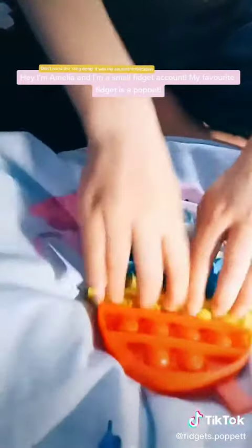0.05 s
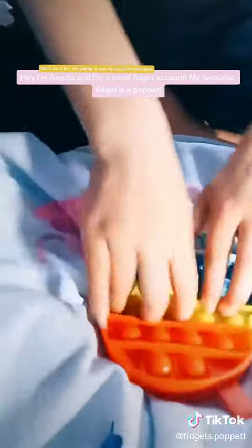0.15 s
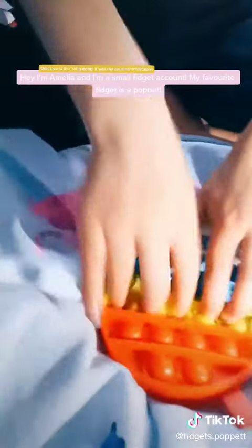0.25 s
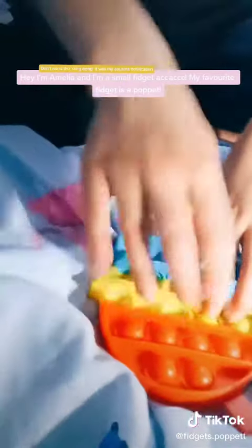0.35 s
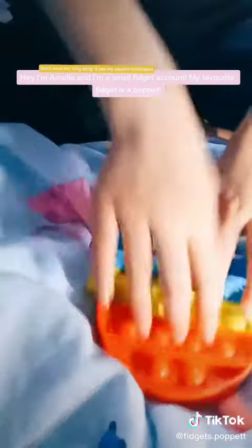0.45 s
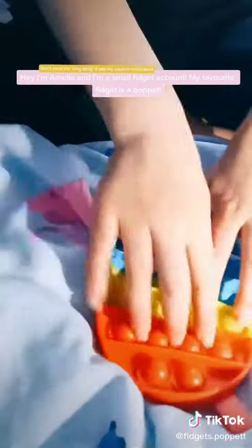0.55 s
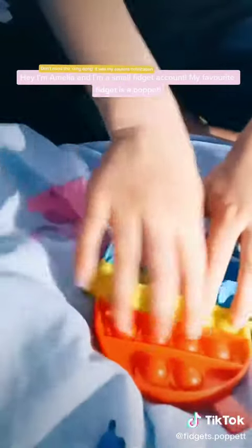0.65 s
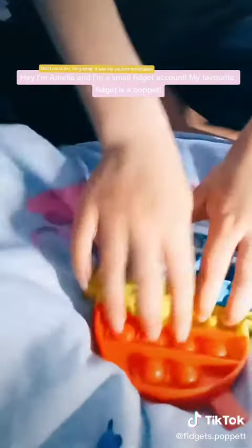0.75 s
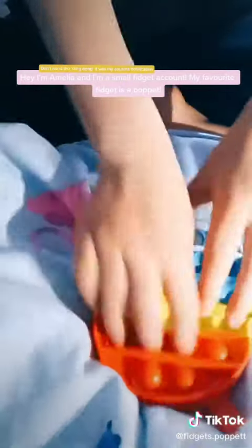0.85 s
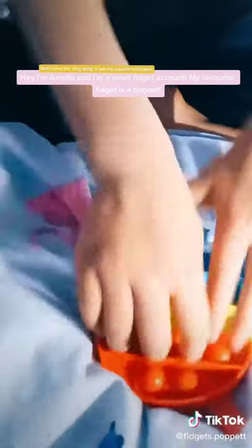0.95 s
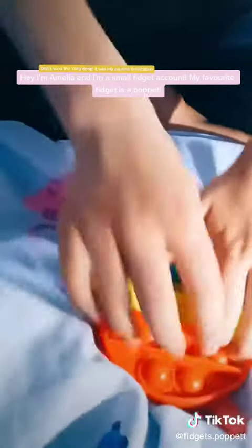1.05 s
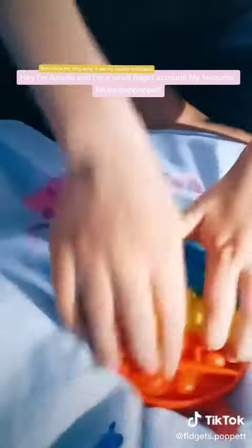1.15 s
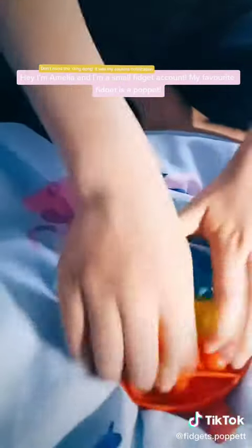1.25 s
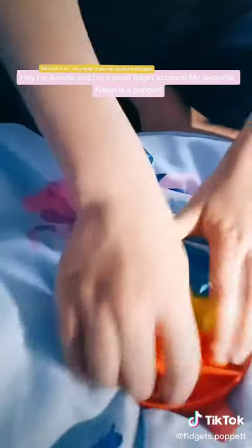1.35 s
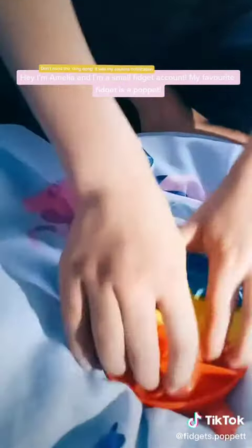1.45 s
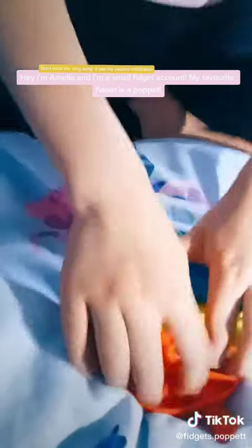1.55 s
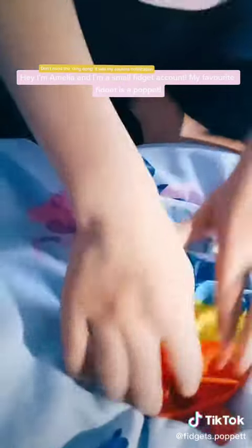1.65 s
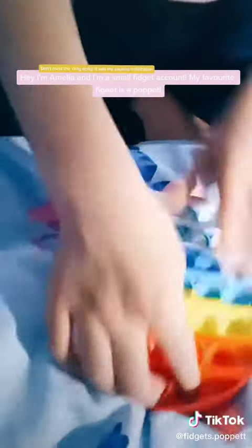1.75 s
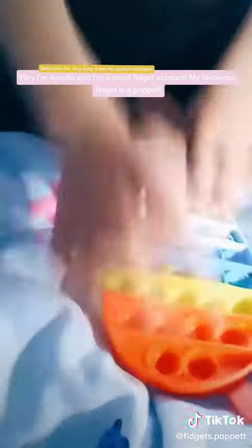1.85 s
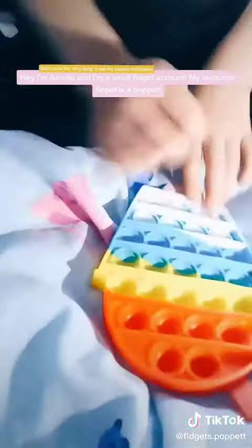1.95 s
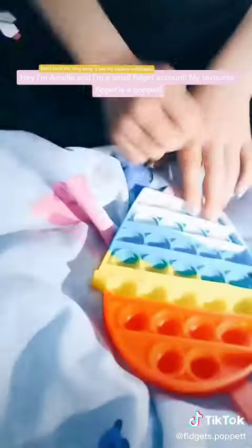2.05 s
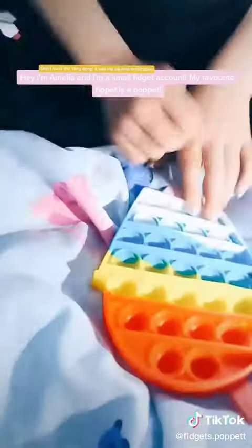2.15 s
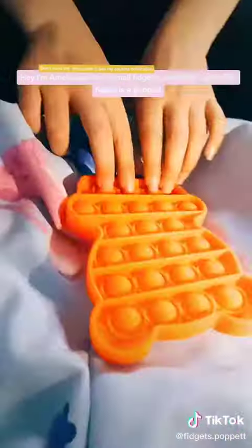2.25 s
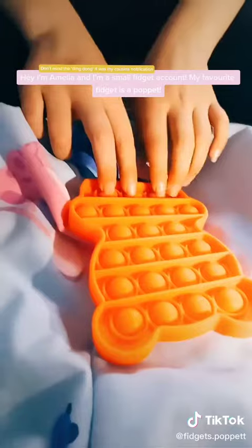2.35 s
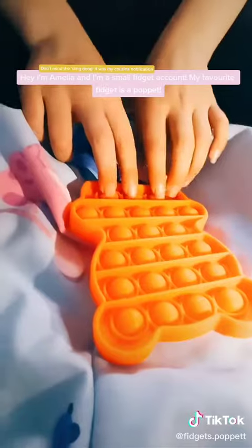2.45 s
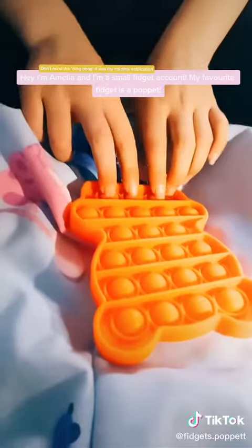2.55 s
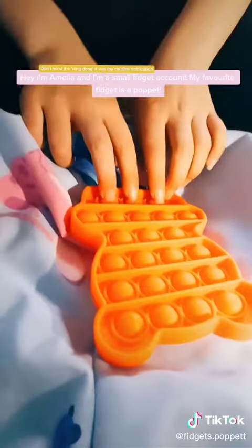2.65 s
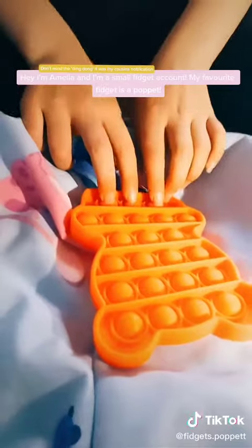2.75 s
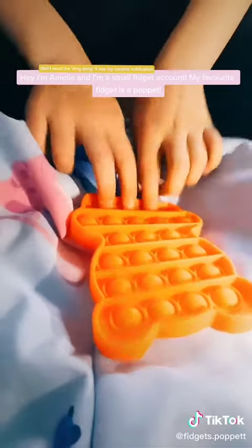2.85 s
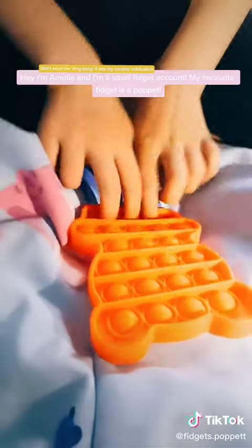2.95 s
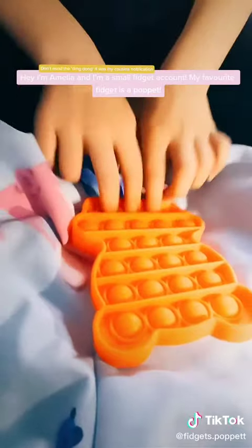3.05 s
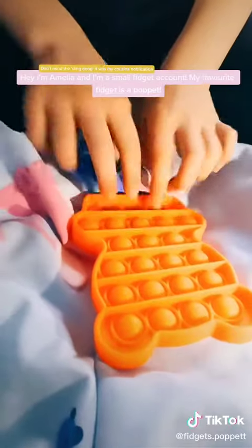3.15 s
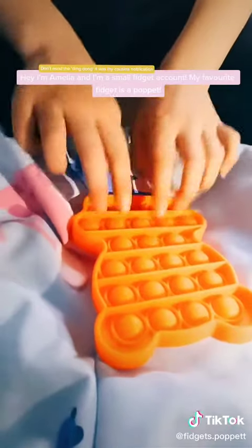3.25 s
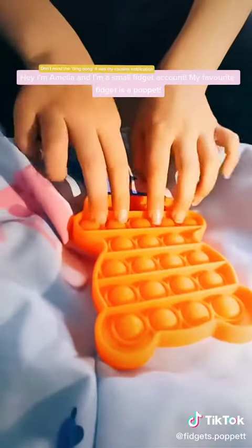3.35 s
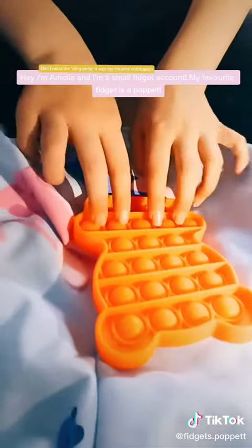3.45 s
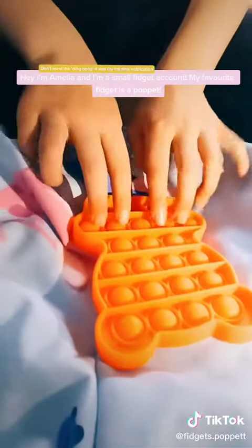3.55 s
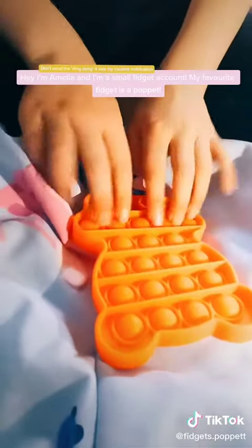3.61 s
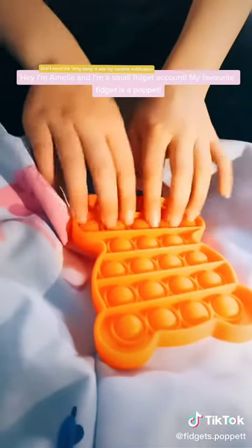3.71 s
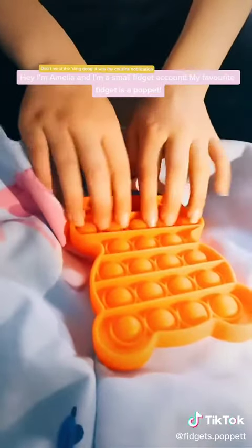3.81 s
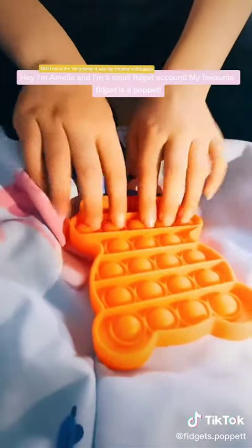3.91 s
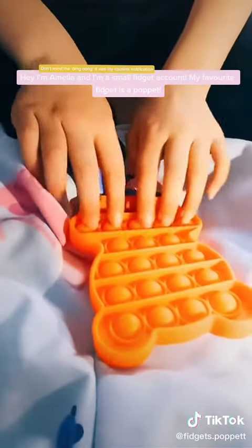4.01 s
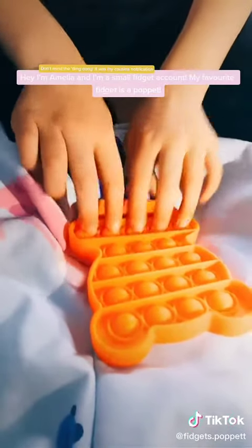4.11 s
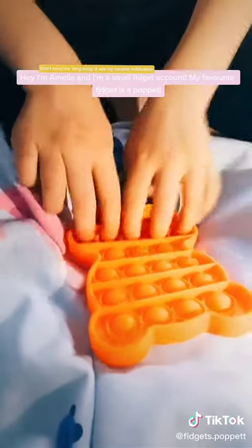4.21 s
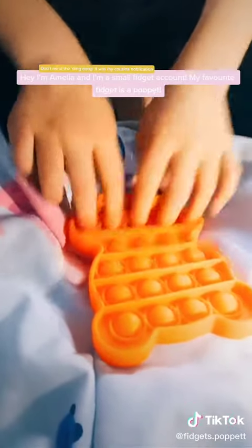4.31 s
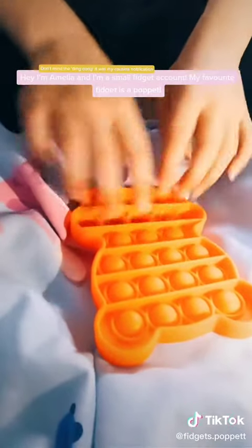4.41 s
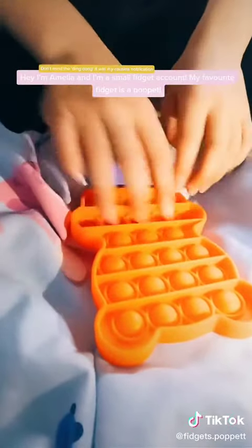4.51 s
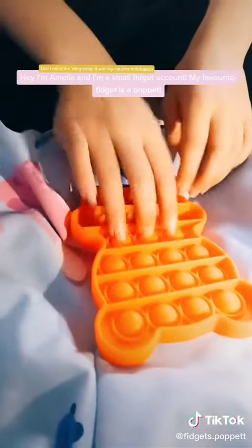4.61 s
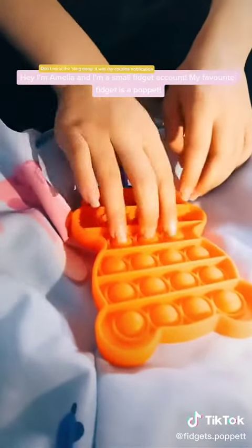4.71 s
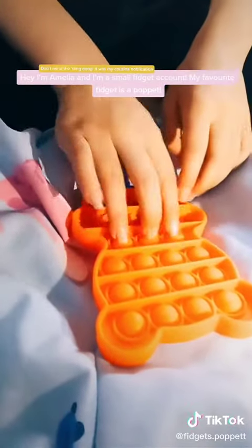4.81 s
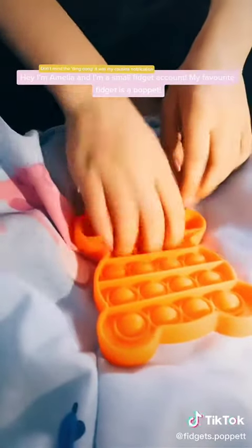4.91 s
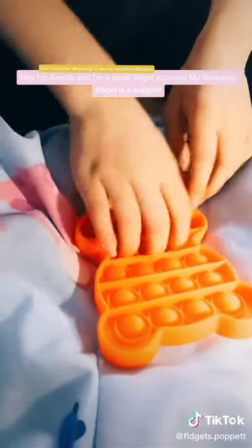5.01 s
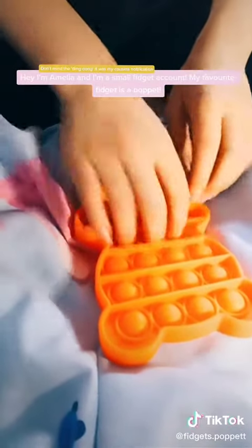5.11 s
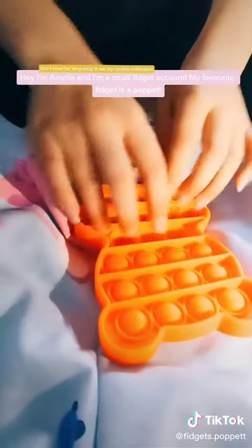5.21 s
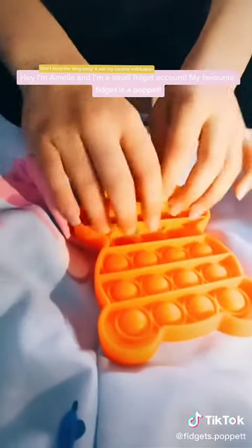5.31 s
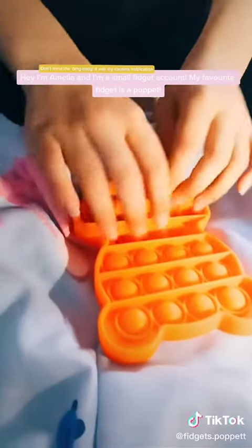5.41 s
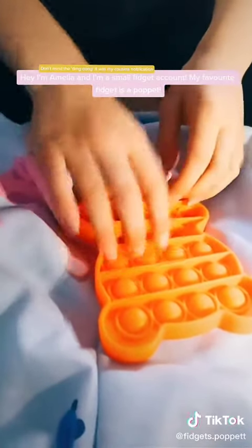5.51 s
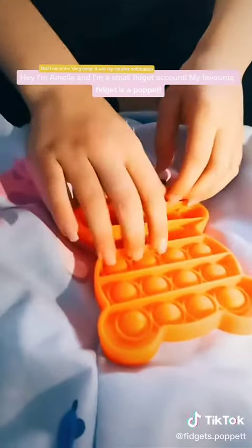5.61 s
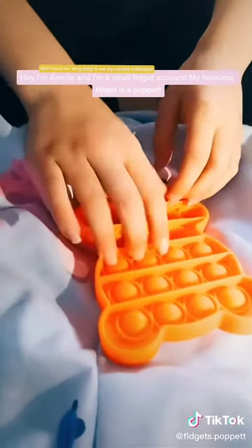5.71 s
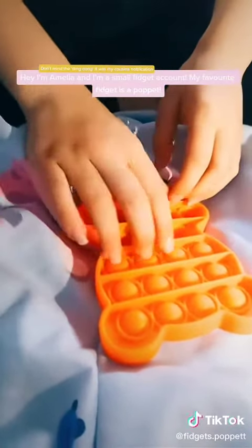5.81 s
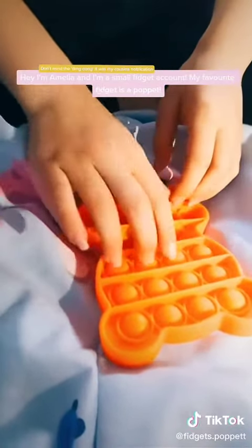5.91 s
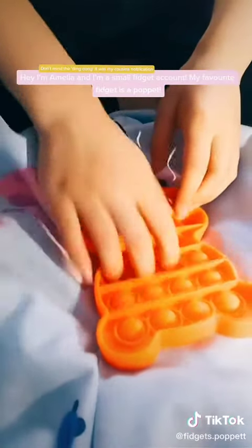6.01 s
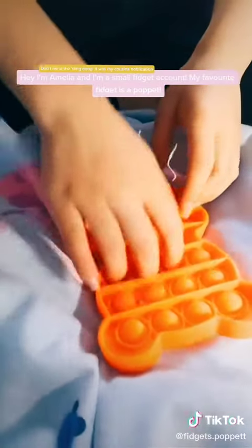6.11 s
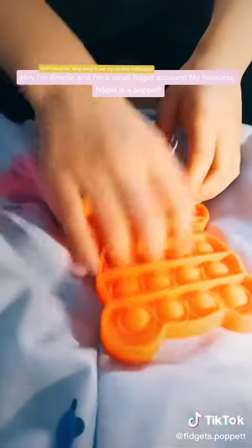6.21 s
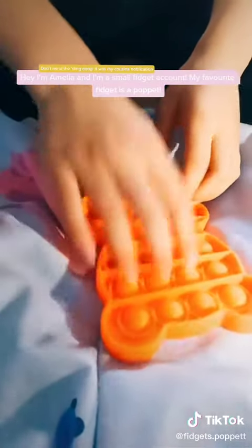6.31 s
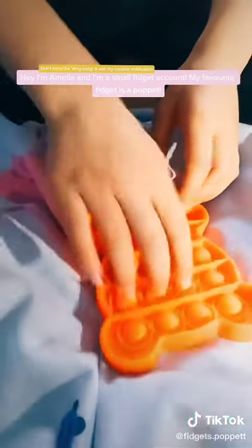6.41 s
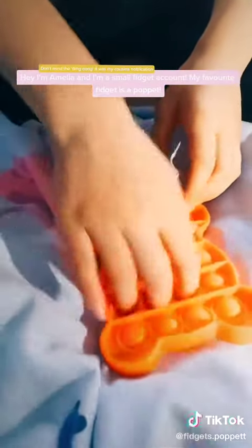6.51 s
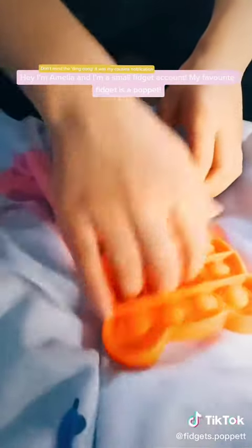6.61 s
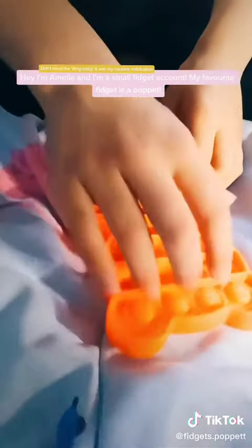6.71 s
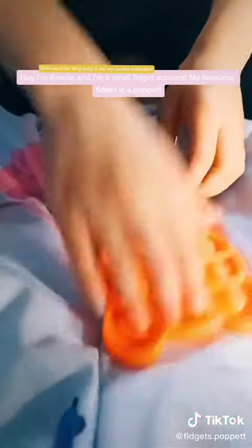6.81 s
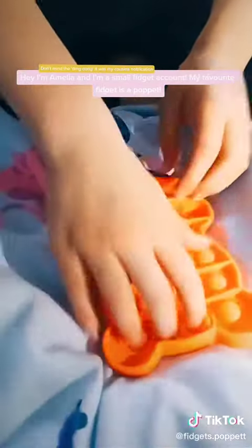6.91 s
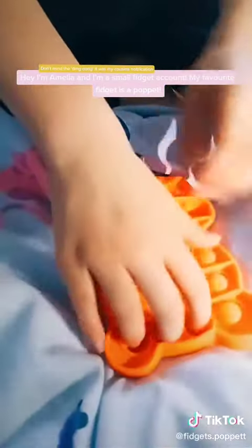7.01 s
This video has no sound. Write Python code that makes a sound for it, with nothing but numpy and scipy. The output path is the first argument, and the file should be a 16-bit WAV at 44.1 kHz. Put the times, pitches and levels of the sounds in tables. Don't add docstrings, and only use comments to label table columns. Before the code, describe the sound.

Crisp, punchy snaps of a rubber bubble toy come in uneven bursts and pauses, close up, with faint skin rubs and one plastic click.

```python
import sys
import numpy as np
from scipy import signal
from scipy.fft import rfft, irfft, next_fast_len
from scipy.io import wavfile
from scipy.ndimage import uniform_filter1d

SR = 44100
rng = np.random.default_rng(int(sys.argv[2]) if len(sys.argv) > 2 else 0)


def level_to_linear(level):
    exponent = np.asarray(level, float) / 20
    return 10 ** exponent


def waveform_to_disk(signal):
    frames = np.transpose(np.atleast_2d(signal))
    scaled = np.clip(frames, -1, 1) * 32767
    samples = np.round(scaled).astype(np.int16)
    wavfile.write(sys.argv[1], SR, samples)


N = 311346


def unit(x):
    return x / np.sqrt(np.mean(x ** 2))


def noise(*shape):
    return rng.standard_normal(shape)


def sine(hz, t):
    return np.sin(2 * np.pi * hz * t)


def colour(x, points):
    size = next_fast_len(x.shape[-1])
    hz, db = np.transpose(points)
    f = np.maximum(np.arange(size // 2 + 1) * SR / size, 1)
    gain = level_to_linear(np.interp(np.log(f), np.log(hz), db))
    return irfft(rfft(x, size) * gain, size)[..., :x.shape[-1]]


def band(x, lo_hz, hi_hz):
    sos = signal.butter(2, [lo_hz, min(hi_hz, 0.45 * SR)], "band", fs=SR, output="sos")
    return signal.sosfilt(sos, x)


def walk(rate):
    hold = int(SR / rate)
    levels = np.repeat(noise(N // hold + 1), hold)
    return uniform_filter1d(levels, hold)[:N]


def fade(t, t60):
    return (t >= 0) * np.exp(-np.log(1000) * np.maximum(t, 0) / t60)


def add(track, s, sound, lead):
    i = int(s * SR) - lead
    track[..., i:i + sound.shape[-1]] += sound[..., :N - i]


def stereo(mid, side):
    return mid + side * np.array([[1], [-1]])


# f/Hz, level/dB per Hz
ROOM_TONE = [(120, -30), (200, -1), (370, -7.5), (433, -11.5), (520, -2.5), (625, -11.5), (1030, -10.5),
             (1200, -13.5), (1450, -7.5), (1860, -14.5), (3340, -15.5), (5820, -17), (7500, -28),
             (11000, -36.5)]
# f/Hz, level/dB per Hz
FAR_RUMBLE = [(20, -45), (40, -15.5), (60, -4.5), (95, 0), (150, -6), (220, -16.5), (350, -45)]
# f/Hz, level/dB per Hz
TOP_HISS = [(9000, -39), (12000, -10.5), (13200, -3.5), (15500, 1), (16100, -19), (17000, -61)]
# on t/s, off t/s
SCREEN_WHINE = [(2.9, 3.83), (4.2, 4.88), (1.5, 1.6)]
# t/s, level/dB
PHONE_GAIN_RIDE = [(0, 2.5), (.07, -.5), (1.0, 2), (1.62, -1), (1.78, -6.5), (2.02, -2), (2.18, -1.1),
                   (2.224, -20), (2.42, -7.5), (2.7, -2), (3.1, 0.35), (6.75, 0), (7.06, 3)]


def air(t):
    gain_db = np.interp(t, *np.transpose(PHONE_GAIN_RIDE))
    hum, rumble, hiss = (unit(colour(noise(2, N), shape)) for shape in (ROOM_TONE, FAR_RUMBLE, TOP_HISS))
    hum_db = 3 - 73 + gain_db + 0.99 * walk(7.8)
    rumble_db = -69 + 2 * gain_db + 6.5 * walk(12)
    hiss_climb_db = 0.7 * (t - 2.5)
    hiss_db = -85.5 + 0.7 * gain_db + hiss_climb_db + 2.2 * walk(16)
    out = level_to_linear(hum_db) * stereo(hum[0], level_to_linear(-2.0) * hum[1])
    out += level_to_linear(rumble_db) * stereo(rumble[0], level_to_linear(-5.5) * rumble[1])
    out += level_to_linear(hiss_db) * stereo(hiss[0], level_to_linear(-2.0) * hiss[1])
    whine_on = sum((t > start) & (t < stop) for start, stop in SCREEN_WHINE)
    out[1] += level_to_linear(-78) * whine_on * sine(15331, t)
    return out


def snap(t, hz, bright_db):
    width = 0.29 / hz * np.where(t < 0, 1.15, 0.9)
    edge = 0.057 / hz * level_to_linear(-0.5 * bright_db + 3.0)
    push = -np.tanh(t / edge) * np.exp(-(t / width) ** 2) * np.where(t < 0, 0.97, 1.1)
    return push / np.abs(push).max()


# t/s, peak level/dB, snap f/Hz, edge brightness/dB
STRIPED_TRAY = [(0.0906, -1.3, 1804, -1.5), (0.1002, -0.63, 1260, -1.5), (0.1106, -0.5, 2644, 1.5),
                (0.1116, -5.5, 1540, -11), (0.4649, -26, 810, -48), (0.4717, -34, 916, -23),
                (0.4907, -39, 618, -25.5), (0.4948, -31.5, 873, -14), (0.5341, -31, 2420, 6),
                (0.5357, -29, 1290, -16), (0.538, -29.5, 1010, -20), (0.7495, 2.5, 1330, -11.5),
                (0.7719, -2, 2167, 6), (0.853, 0.93, 2580, -1), (0.8574, -2, 1670, -8.5),
                (0.871, -0.5, 1700, -8), (0.96, -32.5, 1530, -10), (1.2408, 1.15, 1645, -7),
                (1.3297, -35, 1457, -5), (1.1848, -24.5, 1500, -12), (1.3471, -20.5, 912.5, -13),
                (1.351, -27.5, 1862, 6), (1.4891, 3, 2313, -11), (1.4917, -14.5, 1291, -5.5),
                (1.627, 1.5, 1287, -15)]
# t/s, peak level/dB, snap f/Hz, edge brightness/dB
PLAIN_TRAY_FIRST = [(2.8233, -18, 868, -31.5), (2.8244, -20.5, 1382, -11), (2.8263, -26.5, 1011, -21),
                    (2.8555, -23, 930, -26.5), (2.8655, -1.5, 1800, -3), (2.8857, -1, 1720, -14),
                    (2.887, -11, 1900, -7), (2.9019, -4, 1368, -15), (4.1293, -12, 1160, -29),
                    (4.1303, -19, 1397, -26), (4.1367, -9.5, 1083, -21), (4.1422, 1, 1500, -0.5),
                    (4.1433, -2.5, 1940, 0.5), (4.148, -2, 1511, -13.5), (4.1535, -2, 1370, -17.5),
                    (4.1918, -7, 1090, -16.5), (4.921, -6, 1044, -16.5), (4.9297, -1.2, 1405, -13),
                    (4.9332, -7.5, 1133, -18.5), (4.9415, -4, 1240, -10.5), (4.958, -1.5, 1770, 3.5)]
# t/s, peak level/dB, snap f/Hz, edge brightness/dB
PLAIN_TRAY_LATER = [(5.9899, -11, 980, -26.5), (6.0013, -3.5, 3510, 8), (6.0022, -5.5, 1166, -5.5),
                    (6.017, -9.5, 1150, -7.5), (6.0188, -0.5, 1298, -11.5), (6.0205, 0.5, 1152, -24),
                    (6.44, -9.5, 892, -30.5), (6.4648, 4, 1507, -20), (6.466, -7.5, 1330, -8),
                    (6.4837, -5.5, 1385, -12), (6.8807, -0.5, 1325, -9.5), (6.8863, -17, 1010, -5),
                    (6.9061, 1.1, 1810, -11), (6.9068, -11, 1988, -3), (6.9236, -0.85, 1172, -13.5),
                    (6.9257, -9.5, 1358, -17)]
SPIT_LEVELS = (-40.5, -41.5, -47.5)
ROOM_SHARES = (1, 2.96, 1.8)
# f/Hz, level/dB, t60/s
DOME_MODES = [(1184, -9.5, 0.0091), (560, -21.5, 0.012), (2000, -22.5, 0.0033), (2960, -16.5, 0.0047),
              (4100, -12, 0.0039), (5550, -18, 0.0011)]
# delay t/s, level/dB
BED_BOUNCES = [
    (.0013, -13),
    (.0023, -21),
    (.0036, -28),
]


def pop_sound(t, hz, bright_db, puff):
    pop = snap(t, hz, bright_db)
    for late, bounce_db in BED_BOUNCES:
        level_luck, time_luck = noise(2)
        bounce = snap(t - late * (1 + 0.18 * time_luck), hz * 1.6, bright_db - 2.5)
        pop = pop + level_to_linear(bounce_db + 2.5 * level_luck) * bounce
    mode_hz, mode_db, t60 = (column[:, None] for column in np.transpose(DOME_MODES))
    level_luck, pitch_luck = noise(2, len(mode_hz), 1)
    edge_db = 0.66 * (bright_db + 8) * np.clip(mode_hz / 3000 - 0.3, 0, 1)
    size = level_to_linear(mode_db + 2.2 * level_luck + edge_db)
    ring = size * fade(t, t60) * sine(mode_hz * (1 + 0.11 * pitch_luck), t)
    creak = level_to_linear(-8.5 + 0.6 * bright_db) * band(puff, 1000, 7000)
    return pop - np.sum(ring, axis=0) + creak


def pops():
    near, spit, send = np.zeros((3, N))
    lead = 256
    t = (np.arange(1024) - lead) / SR
    trays = (STRIPED_TRAY, PLAIN_TRAY_FIRST, PLAIN_TRAY_LATER)
    for tray, tray_spit_db, share_db in zip(trays, SPIT_LEVELS, ROOM_SHARES):
        for s, db, hz, bright_db in tray:
            puff = noise(1024) * np.exp(-np.abs(t) / 0.001)
            pop = level_to_linear(db - 3.5) * pop_sound(t, hz, bright_db, puff)
            spit_db = 2 * db + 0.3 * bright_db + tray_spit_db
            add(near, s, pop, lead)
            add(spit, s, level_to_linear(spit_db) * band(puff, 6300, 15000), lead)
            add(send, s, pop * level_to_linear(share_db), lead)
    return near, spit, send


# f/Hz, level/dB, t60/s
ROOM_BANDS = [(170, -2.5, .25), (335, 1, 0.22), (637, -2.5, .24), (1150, 2.5, 0.24), (1940, -1, .25),
              (3170, -2, 0.19), (4600, -6, 0.31), (6300, -11, 0.38)]


def echo(t):
    gap_s, build_s, gate_s = 0.0071, 0.0027, 0.135
    shape = np.clip((t - gap_s) / build_s, 0.12, 1) * np.exp(-(t / gate_s) ** 4)
    out = np.zeros(len(t))
    for hz, db, t60 in ROOM_BANDS:
        out += level_to_linear(db) * fade(t, t60) * band(noise(len(t)), hz / 1.3, hz * 1.3)
    out *= shape
    return out / np.sqrt(np.sum(out ** 2))


def room(x):
    t = np.arange(SR // 2) / SR
    mid, side = (signal.fftconvolve(x, echo(t))[:N] for _ in range(2))
    return level_to_linear(-21) * stereo(mid, level_to_linear(-20) * side)


# t/s, level/dB, f/Hz
HAND_THUDS = [(.14, -33.5, 151), (.295, -53.5, 117), (0.489, -33, 105), (0.549, -49, 101),
              (0.898, -44, 111), (1.012, -36, 106), (1.03, -42, 170), (1.075, -54.5, 90),
              (1.179, -32.5, 88.5), (1.198, -31.5, 153), (1.277, -47, 99), (1.343, -24, 147),
              (1.4, -45.5, 108), (1.582, -49, 117), (1.871, -44.5, 190), (1.922, -45, 109.5),
              (2.07, -49, 120), (2.096, -46.5, 118.4), (3.699, -55, 100), (5.535, -47.5, 98.6),
              (6.18, -61, 79), (6.346, -46, 88.8), (6.651, -50.5, 110), (6.796, -42.5, 62),
              (6.961, -53, 89)]


def thuds():
    out, t = np.zeros((2, N)), np.arange(SR // 3) / SR
    for s, db, hz in HAND_THUDS:
        t60 = 14 / hz * level_to_linear(-0.18 * (db + 45))
        grumble = unit(band(noise(2, len(t)), hz / 2, hz * 2.0))
        wobble = -sine(hz, t) + 0.83 * grumble
        add(out, s, level_to_linear(db) * wobble * fade(t, t60) * np.minimum(t / 0.0078, 1), 0)
    return stereo(out[0], level_to_linear(-16.5) * (out[1] - out[0]))


# middle t/s, length t/s, level/dB, dull part level/dB
SKIN_RUBS = [(0.2, .02, -57.5, -7), (0.331, 0.13, -63, -8), (.49, 0.057, -61.5, 3.5),
             (0.56, 0.032, -65, -3), (0.686, 0.057, -62.5, -8), (0.959, 0.024, -56, 1.5),
             (1.086, 0.05, -63.5, 2), (1.351, 0.039, -51.5, -2), (1.868, 0.076, -61, 2),
             (1.915, 0.046, -52.5, 0.5), (1.952, 0.037, -62, -1.5), (2.102, 0.052, -58.5, 0),
             (3.796, 0.18, -76.5, 2), (4.352, 0.084, -63.5, 1.5), (4.442, 0.093, -72.5, -6.5),
             (5.197, 0.089, -74.5, -1.5), (5.543, 0.042, -68, 2.5), (6.2, 0.045, -53, -11),
             (6.231, 0.033, -58, -4.5), (6.659, 0.052, -52.5, -4.5), (6.696, 0.043, -67.5, 2.5),
             (7.043, 0.045, -65.5, -19.5)]
# f/Hz, level/dB per Hz
RUB_BRIGHT = [(1500, -23), (2500, -12), (4000, 0), (5500, 0), (6500, -5), (8300, -28.5), (12000, -39),
              (15000, -30), (16500, -38)]
# f/Hz, level/dB per Hz
RUB_DULL = [(150, -17.5), (500, 1.5), (1000, -6.5), (1700, 2.5), (2500, -9.5), (4000, -32.5)]


def rubs(t):
    grains = noise(2, N) * level_to_linear(3.2 * rng.exponential(size=N) + 1.8 * walk(90))
    patches = np.zeros(N)
    for hz in (150, 240, 380, 610, 980, 1570, 2500, 4000, 6400, 10300):
        patches += band(grains[0], hz, hz * 1.6) * level_to_linear(2.5 * walk(22))
    bright = unit(colour(patches, RUB_BRIGHT))
    side = unit(colour(grains[1], RUB_BRIGHT))
    dull = unit(colour(patches, RUB_DULL))
    swell, body = np.zeros((2, N))
    for s, length, db, dull_db in SKIN_RUBS:
        near = slice(max(int((s - 0.4) * SR), 0), int((s + 0.4) * SR))
        bump = level_to_linear(db) / (1 + (1.6 * (t[near] - s) / length) ** 2) ** 3
        swell[near] += bump
        body[near] += level_to_linear(dull_db) * bump
    return swell * stereo(bright, level_to_linear(-11) * side) + body * dull


# t/s, level/dB, cup ring f/Hz, upper ring level/dB
FINGER_TAPS = [(0.4642, -23, 800, -26), (0.5352, -33, 807, 4), (1.012, -44.5, 860, -11.5),
               (1.027, -41.5, 860, -9), (1.1842, -38, 1210, -1.5), (1.411, -47.5, 929, -2.5),
               (3.288, -51.5, 952, 9), (3.72, -60, 900, 8), (4.603, -47, 1000, 2), (5.532, -43, 930, 9),
               (6.343, -32.5, 1034, 4), (6.361, -44, 970, 5), (6.7912, -44.5, 2670, 3.5),
               (6.795, -46, 853, 18.5), (6.8761, -34.5, 2415, 7)]


def taps():
    out, t = np.zeros(N), np.arange(2048) / SR
    for s, db, cup_hz, upper_db in FINGER_TAPS:
        cup = sine(cup_hz, t) * fade(t, 0.02)
        upper = sine(2.01 * cup_hz, t) * fade(t, 0.011)
        upper += 0.63 * band(noise(2048), 2500, 6500) * fade(t, 0.0062)
        add(out, s, level_to_linear(db) * (cup + level_to_linear(upper_db) * upper) * np.minimum(t / 0.0012, 1), 30)
    return out


# t/s, length t/s, f/Hz, level/dB
BIRD_CALLS = [(3.06, 0.065, 3546, -66), (3.215, 0.034, 3510, -72), (3.252, 0.068, 3130, -75),
              (3.894, 0.065, 1784, -65), (5.888, 0.088, 3220, -79), (2.16, 0.042, 5213, -71)]


def birds():
    out, t = np.zeros(N), np.arange(-4096, 4096) / SR
    for s, length, hz, db in BIRD_CALLS:
        husk = 1 + 1.2 * unit(band(noise(len(t)), 13, 150))
        whistle = sine(hz, t - 0.28 * t ** 2)
        add(out, s, level_to_linear(db) * husk * np.exp(-(2 * t / length) ** 2) * whistle, len(t) // 2)
    return out


# t/s, peak level/dB, f/Hz, left minus right level/dB
KEY_TICKS = [
    (2.1917, -20, 4760, -6),
    (2.1966, -16, 2135, 11),
    (2.1990, -27, 1000, 16),
    (2.2008, -25.5, 2440, 18),
    (2.202, -22.5, 4900, -18),
    (2.2108, -42, 4500, 1.5),
    (2.215, -39.5, 5500, 1.5),
]


def key():
    out, t = np.zeros((2, N)), np.arange(1024) / SR
    decay = fade(t, 0.008)
    for s, db, hz, pan_db in KEY_TICKS:
        tick = sine(hz, t) * fade(t, 6 / hz) * np.minimum(t * hz * 1.5, 1)
        tick += 0.5 * band(noise(1024), hz, hz * 1.8) * decay
        hiss = level_to_linear(-5) * band(noise(1024), 13200, 14000) * decay
        panned = tick * level_to_linear(np.array([[pan_db], [-pan_db]]) / 2) + hiss * level_to_linear(np.array([[-8], [4]]))
        add(out, s, level_to_linear(db) * panned, 0)
    return out


# f/Hz, level/dB
VOICE_BAND = [(30, -18), (100, 1.5), (300, 0.5), (5500, 1), (6800, -5.5), (8200, -27), (11000, -44),
              (16000, -60.5)]


def microphone(x):
    return colour(x, VOICE_BAND)


def scene():
    t = np.arange(N) / SR
    near, spit, send = pops()
    touch = taps()
    ceiling = 1.08
    limited = ceiling * np.tanh(level_to_linear(-0.9) * near / ceiling)
    echoes = room(level_to_linear(-3.5) * send + level_to_linear(3) * touch)
    voiced = microphone(limited + touch + echoes)
    return voiced + spit + thuds() + rubs(t) + key() + birds() + air(t)


def band_limit(x):
    return signal.sosfilt(signal.butter(12, 16640, fs=SR, output="sos"), x)


def record(dry):
    clipped = np.clip(dry, -0.97, 0.97)
    top_cut = signal.cheby2(10, 60, 17300, fs=SR, output="sos")
    mix = signal.sosfiltfilt(top_cut, clipped)
    return band_limit(mix)


dry = scene()
out = record(dry)
waveform_to_disk(out)
```